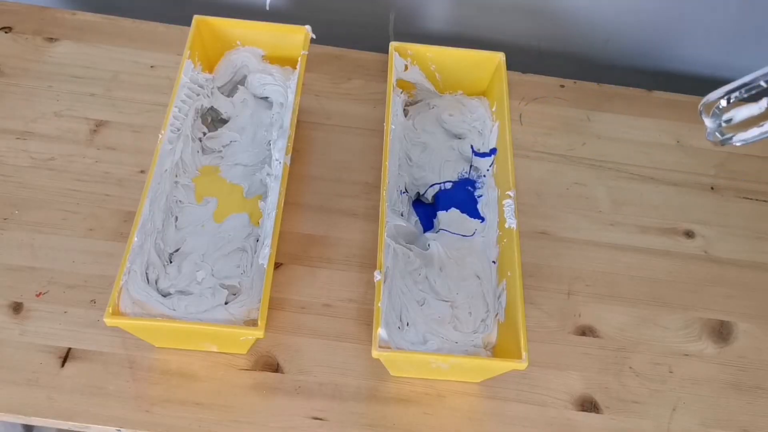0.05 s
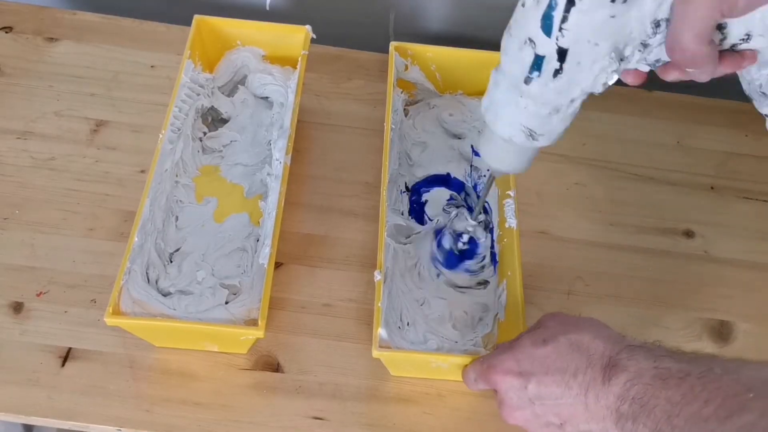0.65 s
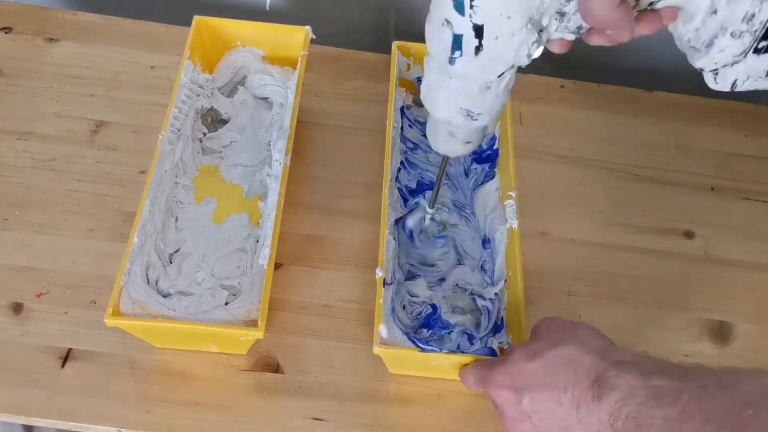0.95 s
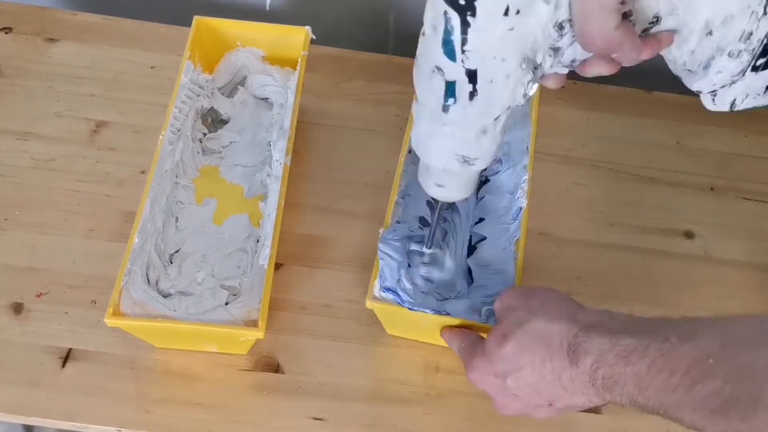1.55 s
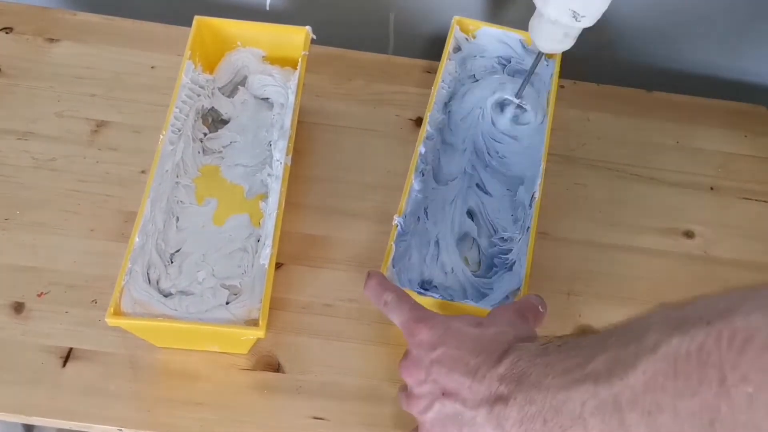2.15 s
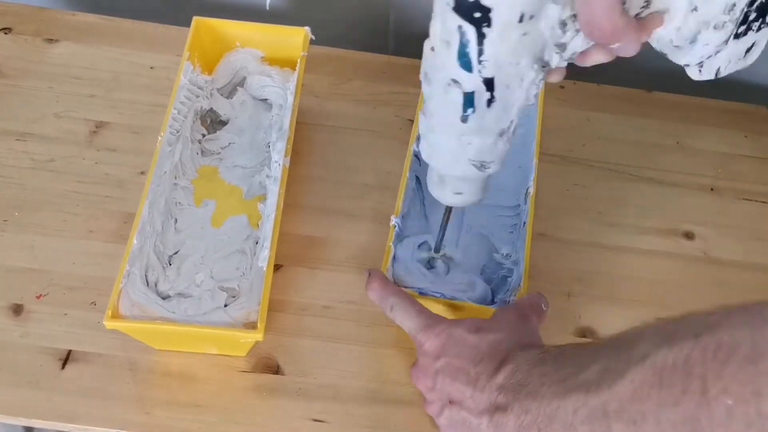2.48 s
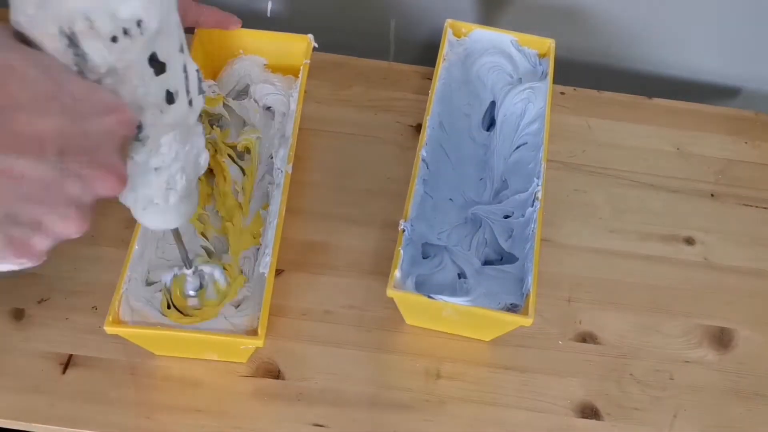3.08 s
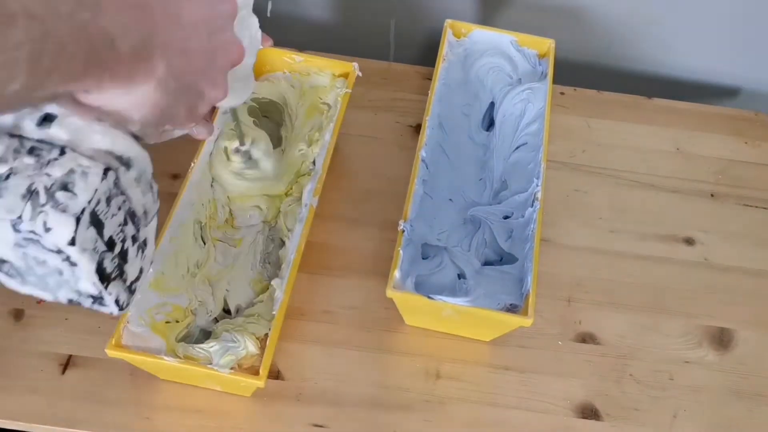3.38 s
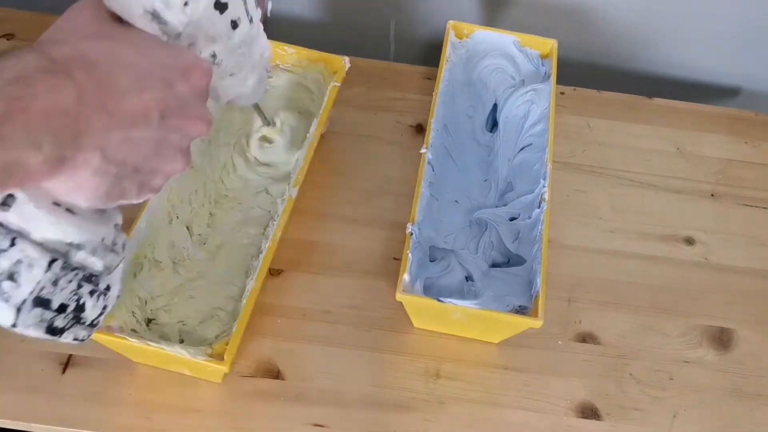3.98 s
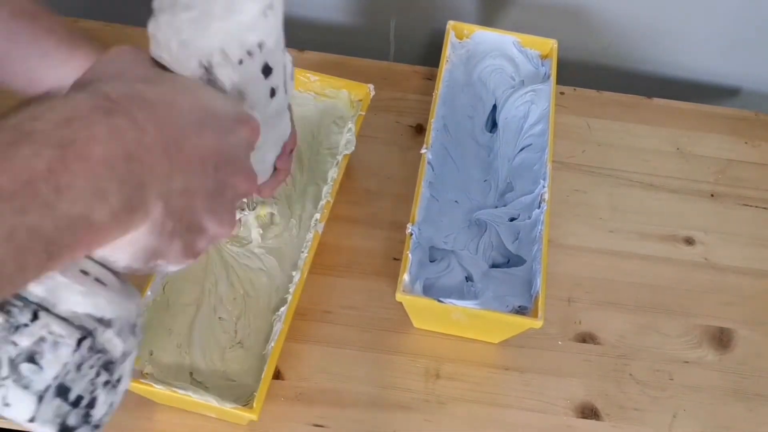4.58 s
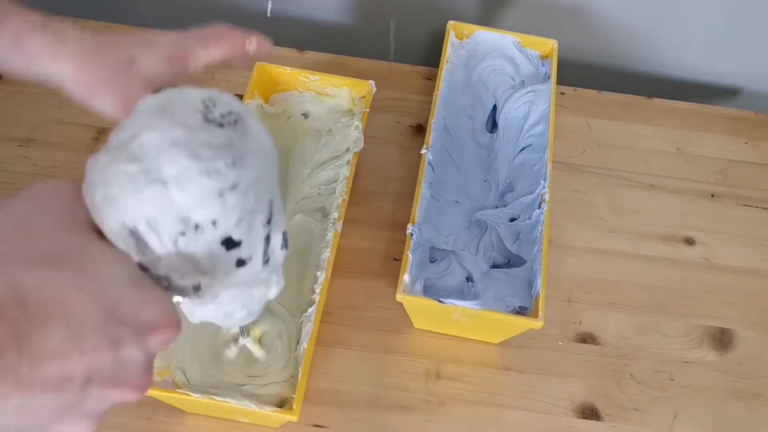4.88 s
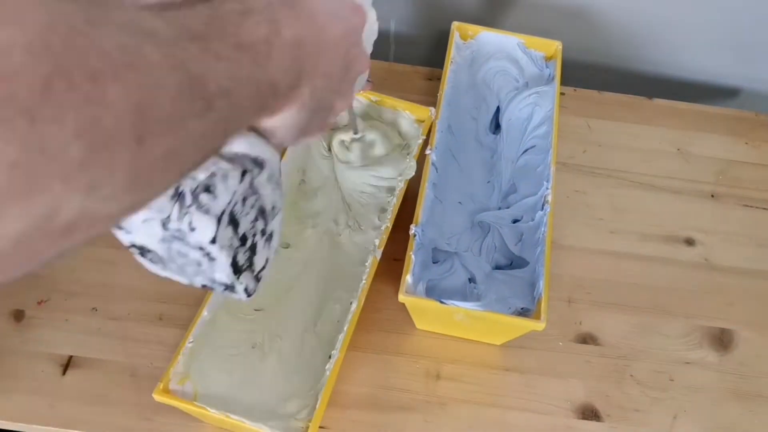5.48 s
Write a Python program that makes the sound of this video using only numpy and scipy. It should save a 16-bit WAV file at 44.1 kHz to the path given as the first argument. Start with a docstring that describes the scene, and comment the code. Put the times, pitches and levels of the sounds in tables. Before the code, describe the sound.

Close by in a quiet room, a cordless drill starts with a brief whine and hiss. The sound then jumps to high speed: the motor becomes a thin whistle while a wire paddle rattles and churns through thick paste in a plastic tray. It pauses midway for soft bumps on a wooden bench, ticks and a short squeaky judder, then resumes in a second tray with brief breaks and sharper knocks.

```python
"""A drill mixing paste, in time-lapse

A cordless drill whisks pigment into thick paste in two plastic trays on a wooden bench, close by.
First its motor starts up in real time, with a whine and a hissing fan. Then everything runs eight
times faster: the whine becomes a thin whistle, the wire paddle rattles along the tray walls in short
strokes, and knocks shrink to ticks. Between the two trays come soft bumps and a squeaky judder."""
import sys
import numpy as np
from scipy import signal
from scipy.fft import rfft, irfft, next_fast_len
from scipy.io import wavfile
from scipy.ndimage import uniform_filter1d

SR = 44100
rng = np.random.default_rng(int(sys.argv[2]) if len(sys.argv) > 2 else 0)


def wav_record(signal):
    """Record a signal, one row per channel, as 16-bit PCM in the file named by sys.argv[1]."""
    frames = np.transpose(np.atleast_2d(signal))
    bounded = np.clip(frames, -1, 1)
    # unit amplitude maps onto the largest positive 16-bit level
    quanta = np.round(bounded * 32767).astype(np.int16)
    wavfile.write(sys.argv[1], SR, quanta)


N = 248268
T = np.arange(N) / SR
LAPSE_S = .833  # the time-lapse starts here

# the quiet room in real time: f/Hz, level/dB
ROOM_NOISE = [(20, -7.5), (60, -13), (150, -16), (400, -15), (1200, -19.5), (3000, -23.5), (7000, -29),
              (15000, -35.5)]
# pulls of the drill's trigger: pressed t/s, released t/s, first whistle f/Hz, settled whistle f/Hz,
# level/dB, change under full load/dB, strength of the whistle's reflection (0-1)
TRIGGER_PULLS = [(.8, 2.758, 10770, 10540, -47.5, 6, 0.26), (3.128, 3.569, 10580, 10590, -40, -4, 0),
                 (3.588, 4.551, 10660, 10600, -39, -1.5, 0.01),
                 (4.721, 4.916, 10660, 10660, -38.5, -2.5, 0.17),
                 (4.975, 5.255, 10670, 10700, -39.5, -2.5, 0.18),
                 (5.261, 5.703, 10660, 10730, -38.5, -1, 0.21)]
# the tones the wire paddle rings with, sped up: f/Hz, width/Hz, level/dB
PADDLE_MODES = [(4690, 130, -1), (4870, 180, 2.5), (5108, 220, 7.5), (5160, 231, -43), (6940, 136, -7.5),
                (8260, 230, -11), (9850, 470, -10), (13300, 370, -36), (16500, 1300, -27)]
# the tones of the second, yellow tray full of paste, sped up: f/Hz, width/Hz, level/dB
YELLOW_TRAY_MODES = [(735, 70, 3), (785, 230, -4), (1076, 110, 1), (1420, 65, -3), (1670, 710, -6),
                     (2112, 215, 1.5), (2480, 270, 4.5), (2644, 130, 4), (3386, 130, 1), (6150, 180, 3),
                     (6870, 250, 3), (8300, 200, -15), (12500, 2800, -13), (17000, 3300, -10)]


def undb(db):
    """Turn decibels into a factor to multiply by."""
    return 10 ** (np.asarray(db) / 20)


def unit(x):
    """Scale a signal to an average strength (rms) of 1."""
    return x / np.sqrt(np.mean(x ** 2))


def walk(rate):
    """A smooth random wobble of strength 1 that changes about rate times a second."""
    size = max(int(SR / rate), 1)
    steps = np.repeat(rng.standard_normal(N // size + 1), size)
    return unit(uniform_filter1d(steps, size)[:N])


def noise(points):
    """Noise of strength 1, its lows and highs shaped by rows of f/Hz, level/dB."""
    hz, db = np.transpose(points)
    size = next_fast_len(N, True)
    f = np.arange(size // 2 + 1) * SR / size
    colour = undb(np.interp(np.log(f + 1), np.log(hz), db))
    return unit(irfft(rfft(rng.standard_normal(size)) * colour, size)[:N])


def ring(modes):
    """An object's answer to one tap: a set of tones (modes); the wider one is, the sooner it dies."""
    t = T[:4096]
    tones = sum(undb(db) * width * np.exp(-np.pi * width * t) * np.cos(2 * np.pi * hz * t)
                for hz, width, db in modes)
    # an object gives off little sound below its lowest tone
    tones = signal.sosfilt(signal.butter(4, 0.73 * modes[0][0], "high", fs=SR, output="sos"), tones)
    return tones / np.sqrt(np.sum(tones ** 2))


def through(x, response):
    """Let x shake something that answers one tap with the given response."""
    return signal.fftconvolve(x, response)[:N]


def gate(start, end, edge_s):
    """A soft switch: 1 between two times, 0 outside."""
    return np.clip((T - start) / edge_s + .5, 0, 1) * np.clip((end - T) / edge_s + .5, 0, 1)


def blows(events, body, crunch, crunch_s, contact_hz, ring_s):
    """Each blow is a push and a brief crunch that ring an object; a lower contact_hz is duller."""
    out = np.zeros(N + 4096)
    contact = signal.butter(2, contact_hz, fs=SR, output="sos")
    for (s, db), grit in zip(events, rng.standard_normal((len(events), 4096))):
        push = crunch * grit * np.exp(-T[:4096] / crunch_s)
        push[0] += 1
        hit = signal.sosfilt(contact, signal.fftconvolve(push, body)[:4096])
        start = int(s * SR)
        # as much energy as the blow's level held for ring_s
        out[start:start + 4096] += undb(db) * hit * np.sqrt(ring_s * SR / np.sum(hit ** 2))
    return out[:N]


def room_tone(lapse, hum_hz=243):
    """Faint room noise, higher and louder in the time-lapse, and a low hum that stops there."""
    fast_room = [(20, -9.5), (100, -4.5), (200, 2), (500, 3), (900, -1.5), (2000, -3.5), (5000, -10.5),
                 (7200, -8), (10000, -17), (15500, -10.5)]  # the room's noise, sped up: f/Hz, level/dB
    hum = undb(-83) * np.sin(2 * np.pi * hum_hz * T) * gate(0.22, LAPSE_S, .05)
    return (1 - lapse) * undb(-78) * noise(ROOM_NOISE) + lapse * undb(-67) * noise(fast_room) + hum


def room_echo(x, die_away_s=0.022, echo_db=-19):
    """Add the room's echo, which is very short in the time-lapse."""
    tail = rng.standard_normal(4096) * undb(-60 * T[:4096] / die_away_s)
    return x + undb(echo_db) * through(x, tail / np.sqrt(np.sum(tail ** 2)))


def brushes():
    """Handling, and the paddle brushing a tray: short swells of noise, each around one pitch."""
    rubs = [(0.252, 0.037, 1080, 910, -68.5), (0.342, 0.091, 45, 50, -72), (0.37, .018, 200, 900, -70.5),
            (0.459, 0.023, 186, 160, -72), (0.637, 0.0079, 620, 90, -44.5), (0.679, .018, 628, 90, -39),
            (.675, 0.02, 1150, 2050, -45.5), (0.705, 0.097, 70, 201, -70.5),
            (.868, 0.0031, 2400, 1100, -55), (3.03, 0.007, 270, 260, -51), (3.072, .024, 217, 170, -57)]  # light touches: t/s, length/s, f/Hz, width/Hz, level/dB
    out = 0
    for s, length, hz, width, db in rubs:
        swell = np.exp(-2 * np.minimum(((T - s) / length) ** 2, 20))
        band = signal.iirpeak(hz, hz / width, fs=SR)
        rub = signal.lfilter(*band, signal.lfilter(*band, rng.standard_normal(N))) * swell
        out = out + rub * undb(db) * np.sqrt(length * SR / np.sum(rub ** 2))
    return out


def bench_bumps():
    """Soft bumps make the wooden bench ring dully."""
    bumps = [(2.8705, -29.5), (2.8866, -47), (2.997, -44), (3.028, -33.5), (3.051, -45), (3.066, -41),
             (3.0855, -34.5), (4.5905, -43), (4.623, -28.5)]  # bumps on the bench: t/s, level/dB
    bench_modes = [(613, 240, -11), (865, 450, -13), (1100, 150, -3), (1760, 960, -7)]  # the tones of the wood: f/Hz, width/Hz, level/dB
    return blows(bumps, ring(bench_modes), crunch=0.067, crunch_s=0.0075, contact_hz=1550, ring_s=0.00042)


def judder(start_s=2.899, gap_s=.00405, count=14):
    """Sharp ticks and a squeak: something sticks and slips at a nearly even rate, harder and harder."""
    ticks = [(2.81, -20.5), (2.8864, -15), (3.053, -34), (3.0645, -23)]  # single ticks between the two trays: t/s, level/dB
    squeak_modes = [(1100, 390, -15.5), (2900, 140, -15), (5200, 260, -25), (7070, 330, 5), (6830, 80, 3.5),
                    (8240, 440, -8.5), (9183, 378, -9.5), (10400, 540, -10), (12800, 1100, -23),
                    (14600, 630, -17)]  # the tones of ticks and squeak: f/Hz, width/Hz, level/dB
    late, force = rng.standard_normal((count, 2)).T
    slip_s = start_s + gap_s * (np.arange(count) + 0.11 * late)
    slip_db = np.linspace(-29, -21, count) + 5.5 * force
    events = ticks + list(zip(slip_s, slip_db))
    return blows(events, ring(squeak_modes),
                 crunch=0.21, crunch_s=0.0017, contact_hz=18000, ring_s=0.00039)


def paddle_knocks(tray_db=-9, firm_knock_db=-12.5, tray_growth=0.24):
    """Hard knocks ring the paddle with a bright snap; the harder the knock, the more the tray joins in."""
    knocks = [(1.154, -21.5), (1.209, -19), (1.8277, -25), (2.0355, -23.5), (2.635, -25.5), (2.743, -31),
              (2.8077, -19), (2.8098, -18), (3.3255, -26), (3.384, -19), (3.5774, -21.5), (4.026, -9),
              (4.06, -20), (4.066, -18), (4.507, -19), (4.6228, -14.5), (5.2008, -19), (5.4625, -19),
              (5.4761, -6.5)]  # the paddle hits the tray: t/s, level/dB
    snap = [(11840, 6700, 0)]  # the snap of hard contact: f/Hz, width/Hz, level/dB
    paddle = ring(PADDLE_MODES) + undb(-11) * ring(snap)
    wires = blows(knocks, paddle, crunch=0.21, crunch_s=0.0012, contact_hz=15700, ring_s=0.00022)
    shoves = [(s, db + tray_db + tray_growth * (db - firm_knock_db)) for s, db in knocks]
    return wires + blows(shoves, ring(YELLOW_TRAY_MODES),
                         crunch=0.11, crunch_s=0.0013, contact_hz=14000, ring_s=0.00019)


def stroke_pressure(edge_s=0.0034, idle_wall_db=-65, idle_paste_db=-62, arch_db=2.5, wobble_db=1.9):
    """How hard the paddle presses on the wall and the paste: most in mid-stroke, with a shaky hand."""
    strokes = [(0.913, 0.028, -45, -62), (1.015, 0.06, -39, -63), (1.083, 0.12, -45.5, -67),
               (1.222, 0.048, -46.5, -65), (1.305, .052, -44.5, -71), (1.384, 0.032, -42, -49.5),
               (1.473, 0.024, -45, -50.5), (1.508, .047, -38, -56), (1.572, 0.065, -49.5, -54),
               (1.677, 0.084, -40.5, -53), (1.829, 0.046, -34.5, -49), (1.882, .11, -50, -53.5),
               (2.012, 0.046, -38.5, -58), (2.066, 0.084, -38, -49), (2.156, 0.079, -41, -50),
               (2.268, 0.042, -47, -51), (2.319, 0.062, -38.5, -50.5), (2.374, 0.049, -53, -51.5),
               (2.431, 0.056, -38, -49), (2.513, 0.1, -40, -45), (2.633, 0.07, -47.5, -53),
               (2.718, 0.08, -48, -45), (3.222, 0.014, -44.5, -49), (3.271, 0.049, -47, -53),
               (3.347, 0.081, -40, -46.5), (3.445, 0.036, -43.5, -48.5), (3.591, 0.043, -55.5, -55.5),
               (3.655, 0.048, -46, -47), (3.752, 0.089, -48, -44), (3.816, .08, -34.5, -48.5),
               (3.895, 0.093, -45, -48.5), (3.991, .082, -33.5, -43.5), (4.081, .034, -46.5, -48.5),
               (4.139, 0.05, -38.5, -44.5), (4.192, .034, -54, -54), (4.228, 0.049, -44.5, -44.5),
               (4.285, 0.039, -38.5, -38), (4.329, .13, -42, -49.5), (4.478, 0.053, -46.5, -43),
               (4.721, .078, -58, -47.5), (4.817, 0.06, -50, -46.5), (4.893, 0.031, -69, -45),
               (4.993, 0.057, -45.5, -43.5), (5.071, .052, -39.5, -42.5), (5.166, 0.069, -41.5, -41),
               (5.272, 0.12, -39.5, -46.5), (5.404, 0.094, -43, -46.5), (5.552, 0.031, -38.5, -39.5),
               (5.613, 0.018, -51.5, -38.5)]  # strokes along a tray: t/s, length/s, wall level/dB, paste level/dB
    wall, paste = np.full(N, undb(idle_wall_db)), np.full(N, undb(idle_paste_db))
    for start, length, wall_db, paste_db in strokes:
        now = slice(int((start - edge_s / 2) * SR), int((start + length + edge_s / 2) * SR))
        from_centre = np.abs(T[now] - start - length / 2)
        contact = np.clip((length / 2 - from_centre) / edge_s + .5, 0, 1)
        pressed = contact * undb(-arch_db * (2 * from_centre / length) ** 2)
        wall[now] += undb(wall_db) * pressed
        paste[now] += undb(paste_db) * pressed
    hand = undb(wobble_db * np.clip(walk(45), -2, 1))
    return wall * hand, paste * hand


def rattle(turns, decay_turns, rub, scatter_db, grain_db):
    """About once a turn the paddle slaps, each time with a new force; gritty rubbing fills the gaps."""
    position = np.abs(turns + .12 * walk(120))  # the paddle wanders, so the point of contact shifts
    force = undb(scatter_db * np.clip(rng.standard_normal(4096), -2, 2))[position.astype(int)]
    slap = force * np.exp(-(position % 1) / decay_turns)
    grit = rng.standard_normal(N) * undb(grain_db * np.clip(walk(2500), -2, 2))
    push = (slap + rub) * grit
    return push / np.sqrt(uniform_filter1d(push ** 2, size=1500) + 1e-9)  # keep the strength even


def trays(x, swap_s=3.1):
    """Let x shake the tray in use: first the blue one, then the yellow one."""
    blue_tray_modes = [(719, 95, 6), (804, 450, -15), (1212, 270, 2.5), (1470, 240, -11), (1810, 360, -4),
                       (2280, 87, 0.5), (2570, 170, 3), (3270, 200, -4.5), (5940, 140, -15.5),
                       (7500, 130, -6), (7550, 250, -3.5), (8570, 380, -5.5), (13000, 530, -9),
                       (16200, 2200, -6)]  # the filled tray's tones, sped up: f/Hz, width/Hz, level/dB
    return np.where(T < swap_s, through(x, ring(blue_tray_modes)), through(x, ring(YELLOW_TRAY_MODES)))


def mixing(turns, wall, paste):
    """The paddle's wires rattle on the wall, while the paste churns and shakes the tray."""
    turning = sum(gate(pressed, released, 0.005) for pressed, released, *_ in TRIGGER_PULLS)
    # as the paste is worked smooth, slapping gives way to rubbing
    rub = np.interp(T, [1.5, 2.3, 5.6], [.09, .32, .44])
    slaps = wall * rattle(turns, decay_turns=0.14, rub=rub, scatter_db=4, grain_db=1.6)
    churn = paste * rattle(turns, decay_turns=0.54, rub=rub / 2, scatter_db=5, grain_db=4)
    wires = undb(-2) * through(slaps, ring(PADDLE_MODES))
    return turning * (wires + trays(undb(-0.5) * churn + undb(-18) * slaps))


def drill_start(start_s=0.538, full_hz=1337, run_up_s=.0135, attack_s=0.0074, hiss_rise_s=0.085):
    """In real time, the motor and gears whine up to speed, and the fan's hiss swells after them."""
    overtones = [(1, 0), (2, -26), (3, -8.5), (4, -12), (5, -13), (6, -13), (8, -27), (9, -6.5), (10, -2),
                 (11, -6)]  # motor and gear tones: multiple of the whine's pitch, level/dB
    whine_levels = [(0.545, -59.5), (0.573, -50), (0.589, -39), (0.611, -46), (0.763, -40.5),
                    (0.795, -43.5), (0.83, -45)]  # how loud the whine is: t/s, level/dB
    fan_noise = [(100, -11.5), (450, -20.5), (800, -15), (1100, -4), (2100, -4.5), (3500, 0.5), (5200, 2),
                 (6200, 0.5), (7600, 3), (10000, 0), (12300, 5.5), (14000, 9.5), (15700, 4)]  # the hiss of fan and gears: f/Hz, level/dB
    age = np.maximum(T - start_s, 0)
    hz = full_hz * (1 - .34 * np.exp(-age / run_up_s)) * (1 + 0.00201 * walk(20))
    phase = 2 * np.pi * np.cumsum(hz * (1 + 0.0015 * walk(250))) / SR
    # the higher tones flutter more with the shaft
    whine = sum(undb(db + min(k / 2, 2) * walk(59.7)) * np.sin(k * phase) for k, db in overtones)
    whine_db = np.interp(T, *np.transpose(whine_levels))
    hiss = noise(fan_noise) * (1 + 0.12 * np.sin(phase / 6))
    hiss_db = -37 - 12.5 * np.maximum(1 - age / hiss_rise_s, 0)
    running = gate(start_s, LAPSE_S, 0.0022) * np.minimum(age / attack_s, 1)
    return (np.sqrt(2) * whine * undb(whine_db) + hiss * undb(hiss_db)) * running


def motor_load(wall, smooth_s=.03, half_load_db=-48):
    """How hard the motor works, 0-1: it follows the pressure on the wall, smoothed by its spinning mass."""
    drag = uniform_filter1d(wall, int(smooth_s * SR))
    return drag / (drag + undb(half_load_db))


def drill_whistle(load, sag_hz=59.6, drift_hz=15, surge_db=7.5, flutter_db=1.62, air_db=-56):
    """The sped-up motor chirps up at each pull and sags under load. Also counts the paddle's turns."""
    air_noise = [(200, -13), (1500, -5), (5000, -26), (8500, -3.5), (10000, 5.5), (10900, 16.5),
                 (11800, -8), (13500, 1), (15700, -5)]  # the hiss around the whistle: f/Hz, level/dB
    spin_up_s, surge_s, settle_s, coast_s, brake_s = .0014, .028, .4, .06, .0011
    fade_at_s, fade_period_s, cycles_per_turn = 1.075, .11, 60
    hz, db, running = np.zeros(N), np.zeros(N), np.zeros(N)
    # as the drill sweeps to and fro, a reflection weakens and strengthens the whistle in turn
    mirrored = np.exp(2j * np.pi * ((T - fade_at_s) / fade_period_s + 0.054 * walk(15)))
    for pressed, released, first_hz, settled_hz, pull_db, load_db, reflection in TRIGGER_PULLS:
        age, since_release = np.maximum(T - pressed, 0), np.maximum(T - released, 0)
        rise = 1 - np.exp(-age / spin_up_s)
        full_hz = settled_hz + (first_hz - settled_hz) * np.exp(-age / settle_s) - sag_hz * load
        hz = np.where(T > pressed, full_hz * rise * np.exp(-since_release / coast_s), hz)
        fade_db = 20 * np.log10(np.abs(1 - reflection * mirrored))
        level_db = pull_db + load_db * load + fade_db + surge_db * np.exp(-age / surge_s)
        db = np.where(T > pressed, level_db, db)
        running = np.where(T > pressed, rise ** 5 * np.exp(-since_release / brake_s), running)
    unsteady_hz = (hz + drift_hz * walk(25)) * (1 + .001 * walk(150) + .0025 * walk(1500))
    cycles = np.cumsum(unsteady_hz) / SR
    whistle = np.sqrt(2) * np.sin(2 * np.pi * cycles) * undb(db + flutter_db * walk(90))
    air = undb(air_db + 3.9 * walk(27)) * noise(air_noise)
    return running * (whistle + air), cycles / cycles_per_turn


def scene():
    """Drill and trays in the centre, over faint room noise."""
    lapse = np.clip((T - LAPSE_S) / 0.0026 + .5, 0, 1)  # 0 in real time, 1 in the time-lapse
    wall, paste = stroke_pressure()
    whistle, turns = drill_whistle(motor_load(wall))
    clatter = judder() + bench_bumps()
    room = room_tone(lapse)
    drill_and_handling = drill_start() + brushes()
    sped_up = lapse * whistle + room_echo(lapse * mixing(turns, wall, paste) + paddle_knocks() + clatter)
    mid = room + drill_and_handling + sped_up
    side = undb(-80.5) * noise(ROOM_NOISE)  # only a faint, even hiss differs between the ears
    return np.array([mid + side, mid - side])


def record(dry, top_hz=15740):
    """Cut off the highest treble."""
    return signal.sosfilt(signal.ellip(10, .2, 80, top_hz, fs=SR, output="sos"), dry)


dry = scene()
out = record(dry)
wav_record(out)
```